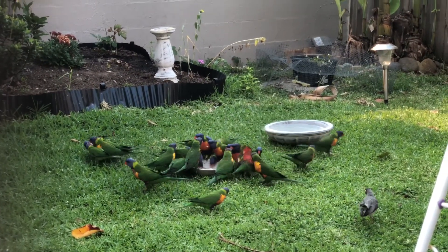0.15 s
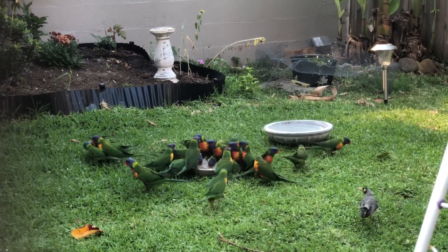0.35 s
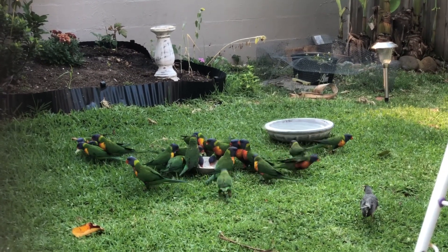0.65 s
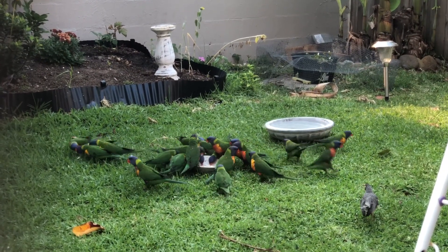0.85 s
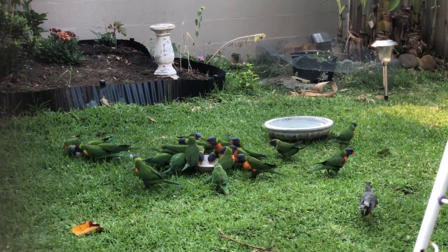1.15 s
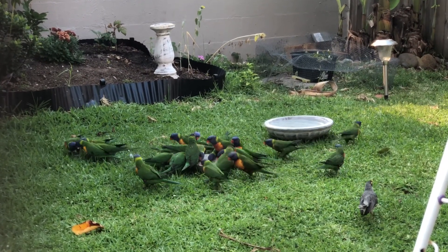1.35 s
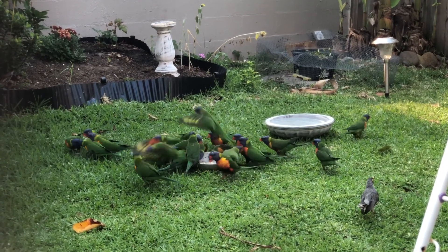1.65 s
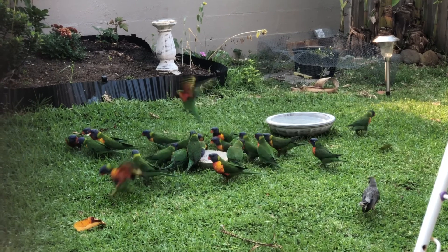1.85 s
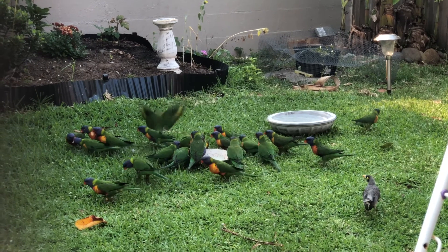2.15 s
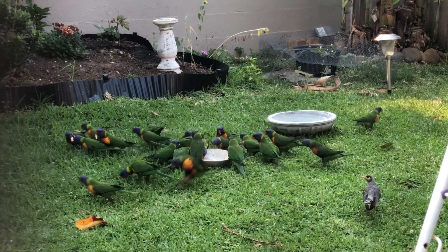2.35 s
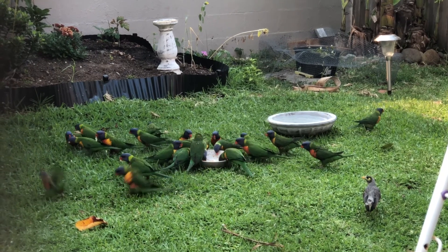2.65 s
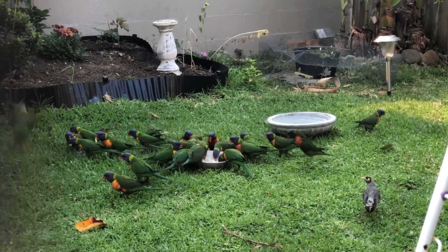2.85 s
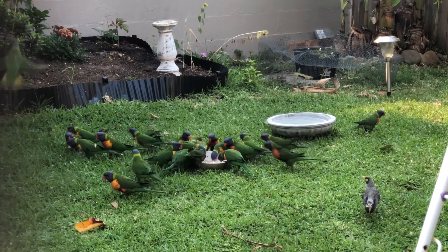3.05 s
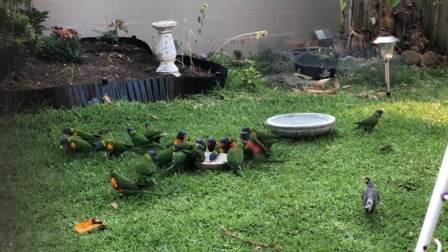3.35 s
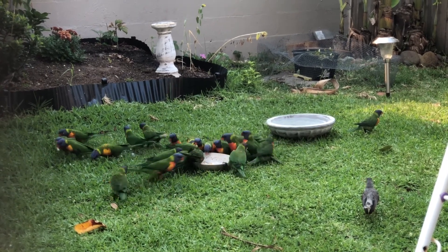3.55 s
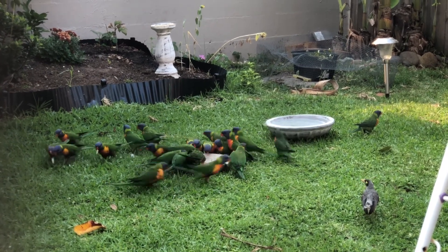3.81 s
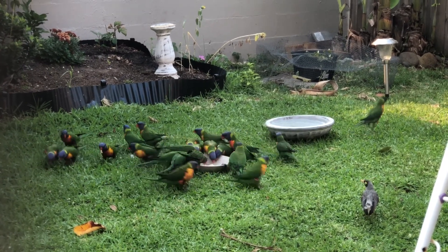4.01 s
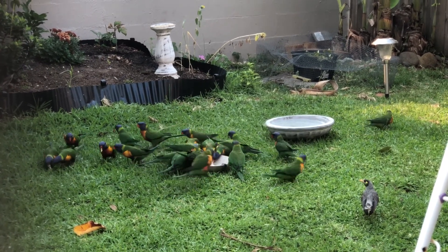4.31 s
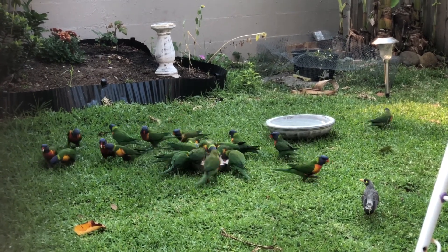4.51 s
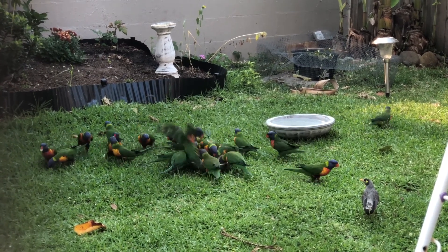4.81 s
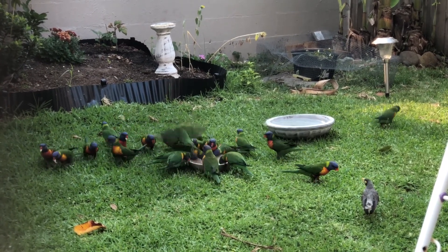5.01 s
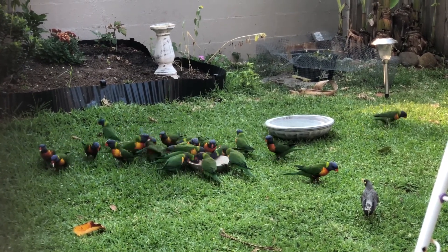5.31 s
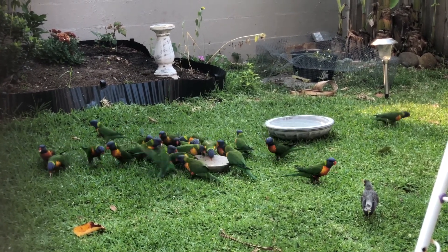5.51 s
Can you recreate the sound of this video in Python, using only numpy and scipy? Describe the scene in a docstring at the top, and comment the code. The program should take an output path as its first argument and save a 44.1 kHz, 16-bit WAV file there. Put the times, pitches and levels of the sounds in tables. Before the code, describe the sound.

Piercing parrot screeches early, quiet chirps and a whistle midway, then a run of raspy squawks, with a low outdoor hum behind.

```python
"""Lorikeets squabble over a feeding dish on a lawn, a few metres away: harsh screeches, squawks,
yelps, a clear whistle and thin chirps, with rustling wings, over a distant engine and a soft wash.
Calls are sums of harmonics blurred by chaos plus puffed noise, filtered by a voice colour.
Wings are noise pulsed by the beat; the engine is a bank of sines; the wash is filtered noise.
Discrete echoes and a short scattered tail throw calls and wings back."""
import sys
import numpy as np
from scipy import signal
from scipy.fft import rfft, irfft, next_fast_len
from scipy.io import wavfile
from scipy.ndimage import uniform_filter1d

SR = 44100
rng = np.random.default_rng(int(sys.argv[2]) if len(sys.argv) > 2 else 0)


def master_out(mix):
    """Clip the mix to full scale and print it as 16-bit PCM to the path in sys.argv[1]."""
    frames = np.transpose(np.atleast_2d(mix))
    ceiling = np.clip(frames, -1, 1)
    pcm = np.round(ceiling * 32767).astype(np.int16)
    wavfile.write(sys.argv[1], SR, pcm)


N = 250047

# voice colours, from syrinx, throat and beak: [f/Hz, level/dB]
SHRILL = [(600, -44), (1000, -14.5), (1500, -20), (2000, -12), (2800, -5), (3400, -6.5), (4050, 3.5),
          (4700, -5.5), (5400, 0.5), (6800, -8), (8500, -8.5), (11000, -18.5), (14000, -13.5), (16000, -27)]
HARSH = [(600, -54), (1000, -8.5), (1500, -20.5), (2000, -7.5), (2700, 0), (3200, -7), (3850, 5.5),
         (4400, -8), (5200, 2.5), (6500, -9.5), (8500, -10.5), (11500, -23.5), (16000, -26)]
HOARSE = [(700, -25.5), (1500, -14), (1900, -14), (2700, -3), (3500, -8.5), (4200, -0.5), (5500, -2.5),
          (7000, -7), (8500, -13), (11000, -19), (13500, -18), (16000, -28)]
NAGGING = [(800, -22), (1300, -8.5), (1600, -6), (2050, 4.5), (2600, 0.5), (3300, 1.5), (3850, -2.5),
           (4400, -17), (5200, 2.5), (6000, -4.5), (7200, -14), (9500, -14), (12500, -21), (16000, -34)]
THROATY = [(800, -21.5), (1400, -15), (1900, -4), (2350, -3), (2900, -14), (3500, -6.5), (4100, -22),
           (4750, -9), (5600, -26), (6800, -22.5), (8000, -22), (9300, -22), (12000, -39), (15000, -31)]
RASPING = [(700, -34), (1100, -6.5), (1600, -17), (2100, -5), (2650, -0.5), (3300, -1), (4000, 0),
           (4700, -4.5), (5500, -3.5), (7000, -8), (8500, -8), (11000, -17.5), (13500, -22.5), (16000, -24)]
PURE = [(900, -30), (1500, -8), (1950, 0), (2600, 0), (3900, -10), (5100, -9), (6200, -21), (7700, -19),
        (9200, -36), (11000, -26), (13000, -29), (15500, -28)]
MELLOW = [(500, 18), (800, 11.5), (1650, 13.5), (2600, 8), (3500, -1), (6000, -57), (12000, -51)]
SWEEP = [(1200, -24), (2200, 6), (3300, -32), (4600, 14.5), (5600, -6.5), (7000, -5), (9000, -28),
         (12000, -22), (16000, -12)]
GRUFF = [(800, -18), (1400, -14), (1900, 1), (2300, 3), (2850, -8), (3400, 1.5), (4050, -12.5),
         (4750, -0.5), (5600, -10), (6800, -7.5), (8100, -23), (9500, -17.5), (12000, -21), (15000, -21)]
SCOLDING = [(850, -35), (1280, -11), (1650, -30), (2050, 2), (2450, 0.5), (3050, -8.5), (3850, -4),
            (4300, -14), (5150, -4), (5900, -12), (6500, -8), (9500, -14.5), (12800, -31), (14800, -23)]


def amp(db):
    """Decibels to gain."""
    return 10 ** (np.asarray(db) / 20)


def unit(x):
    """Scales to rms 1."""
    return x / np.sqrt(np.mean(x ** 2) + 1e-20)


def read(points, hz):
    """Reads a table on a log-frequency axis."""
    f, value = np.transpose(points)
    return np.interp(np.log(hz + 1), np.log(f + 1), value)


def add(mix, s, sound):
    """Mixes a sound in at time s, trimmed to fit."""
    start = int(round(s * SR))
    sound = sound[max(-start, 0):]
    part = mix[max(start, 0):][:len(sound)]
    part += sound[:len(part)]


def colour(x, spectrum):
    """Filters by an [f/Hz, level/dB] table, 12 dB/octave down below its first point; rms 1."""
    size = next_fast_len(len(x) + 512)
    hz = np.fft.rfftfreq(size, 1 / SR)
    gain = amp(read(spectrum, hz)) * np.minimum(hz / spectrum[0][0], 1) ** 2
    return unit(irfft(rfft(x, size) * gain, size)[:len(x)])


def wander(rate_hz):
    """Smooth random motion: noise rolled off above rate_hz; rms 1."""
    hz = np.fft.rfftfreq(2 ** 18, 1 / SR)
    noise = rng.standard_normal(2 * len(hz) - 2)
    return unit(irfft(rfft(noise) / (1 + (hz / rate_hz) ** 4))[:N])


def membrane(turns, hz, chaos, blur):
    """Harmonics of one vibrating membrane; chaos turns each from a line into a band of its own."""
    offsets = rng.integers(N, size=(32, 2, 1))
    tone = np.zeros(len(turns))
    for k in range(1, int(SR / 2 / hz.max()) + 1):
        along, across = blur[(np.arange(len(turns)) + offsets[k]) % N] * chaos / np.sqrt(2)
        angle = 2 * np.pi * k * turns + k * k
        tone += (np.sqrt(1 - chaos ** 2) + along) * np.cos(angle) + across * np.sin(angle)
    return unit(tone)


def brighten(sound, effort_db, per_db, knee_hz=6500):
    """The treble is the last to come and the first to go as a bird presses harder and lets go."""
    hz = np.fft.rfftfreq(len(sound), 1 / SR)
    body = irfft(rfft(sound) / (1 + (hz / knee_hz) ** 6), len(sound))
    below_peak_db = np.maximum(effort_db - effort_db.max() + 0.5, -10)
    return body + (sound - body) * amp(per_db * below_peak_db)


def syrinx(voice, rows, chance, jitter=0.0535, smear=1.0, rasp=0.96, twin=0.48, twin_hz=1330,
           flutter_db=2, fitful=0.2805, waver=0.02995, bright_per_db=0.5):
    """One call: two membranes that slip in and out of chaos, heard through throat and beak."""
    # rows: t/s, effort/dB, pitch/Hz, roughness 0-1
    s, *columns = np.transpose(rows)
    t = np.arange(s[0], s[-1], 1 / SR)
    effort_db, hz, rough = (np.interp(t, s, c) for c in columns)
    fast, shake, fits, hiss = chance[:-1, (np.arange(len(t)) + rng.integers(N)) % N]
    # clearer and more chaotic stretches alternate within a call
    rough = np.clip(rough * (1 + fitful * fits), 0, 1)
    chaos = np.clip(smear * rough, 0, 1)
    # uneven cycles smear the upper harmonics most
    uneven = 1 + jitter * rough * fast + waver * np.minimum(rough, .5) * fits
    turns = np.cumsum(hz * uneven) / SR
    # in loud, rough calls the other side joins at its own pitch, bending with the first
    other_hz = twin_hz * hz / hz.mean() * (1 + jitter * rough * fast[::-1] + waver * shake / 2)
    joined = np.clip(twin * rough * np.interp(effort_db, [-28, -18], [0, 1]), 0, 1)
    tone = np.sqrt(1 - joined) * membrane(turns, hz, chaos, chance[-1])
    tone += np.sqrt(joined) * membrane(np.cumsum(other_hz) / SR, other_hz, chaos, chance[-1])
    # air escapes in one puff a cycle
    puffs = unit(hiss * (1 + 0.25 * np.cos(2 * np.pi * turns)))
    share = np.clip(rasp * rough ** 2, 0, 1)
    source = np.sqrt(1 - share) * tone + np.sqrt(share) * puffs
    sound = brighten(colour(source, voice), effort_db, bright_per_db)
    # level out, so that effort sets the loudness; roughness makes it shudder
    sound /= np.sqrt(abs(uniform_filter1d(sound ** 2, size=700)) + 1e-6)
    sound = unit(sound * amp(flutter_db * rough * shake))
    edges = np.clip(np.minimum(t - t[0], t[-1] - t) / 0.0012, 0, 1)
    return s[0], sound * amp(effort_db) * edges


def press(start, let_go, first_db, last_db, shape, belly_db=1.5):
    """A bird's effort: a quick attack, a hold that leans and swells, a release; gives t/s and dB."""
    attack_s, attack_db, release_s, release_db = shape
    t = np.arange(start, let_go + release_s, 1 / SR)
    u = np.minimum((t - start) / (let_go - start), 1)
    hold = first_db + (last_db - first_db) * u + belly_db * (np.sin(np.pi * u) - 2 / np.pi)
    attack = np.interp(t, [start, start + attack_s], [attack_db, 0])
    release = np.interp(t, [let_go, let_go + release_s], [0, release_db])
    return t, hold - attack - release


def upsweep(end, db, hz, length_s=.016, rise=.26, rough=0.27, attack_s=0.0056, attack_db=10,
            overlap_s=0.0069, fade_db=8, curve=1.5):
    """A clear note flicks up ever faster, then climbs on and fades under the body of the screech."""
    t = np.arange(-length_s, overlap_s, 1 / SR)
    knots_s = [-length_s, attack_s - length_s, 0, overlap_s]
    effort_db = db - np.interp(t, knots_s, [attack_db, 0, 0, fade_db])
    pitch = hz * (1 + rise * ((t - t[0]) / length_s) ** curve)
    return SWEEP, np.column_stack([end + t, effort_db, pitch, np.full(len(t), rough)])


def screech(voice, start, let_go, first_db, last_db, top_hz, last_hz,
            first_rough, middle_rough, last_rough, sweep_db, sweep_hz, scoop_share=.1, scoop_s=.036):
    """An upsweep breaks into a low, loud note that scoops up to its top pitch, then sags."""
    # effort: [attack/s, attack depth/dB, release/s, release depth/dB]
    screech_shape = (0.031, 6.6, .045, 22.5)
    t, effort_db = press(start, let_go, first_db, last_db, screech_shape)
    scoop = scoop_share * top_hz * np.maximum(1 - (t - start) / scoop_s, 0) ** 2
    sag = (top_hz - last_hz) * np.maximum(t - start - scoop_s, 0) / (let_go - start - scoop_s)
    knots_s = [start, (start + let_go) / 2, let_go]
    rough = np.interp(t, knots_s, [first_rough, middle_rough, last_rough])
    body = np.column_stack([t, effort_db, top_hz - scoop - sag, rough])
    return [upsweep(start, sweep_db, sweep_hz), (voice, body)]


def engine(unsteady=0.35, drift=0.0085):
    """The low, loosely harmonic drone of a far engine, each line fading in and out on its way."""
    # course: [t/s, level/dB, cycle rate/Hz before drift]
    engine_course = [(0, -37, 23.3), (.7, -32.5, 23.9), (1.2, -36.5, 23.76), (1.7, -35.5, 24.22),
                     (2.3, -38.5, 23.56), (2.85, -38, 23.59), (3.15, -42.5, 23.38), (4, -49, 22.8),
                     (4.6, -44.5, 24.23), (5.2, -41, 24.5), (5.67, -50, 23.76)]
    # lines: [multiple of the cycle rate, relative level/dB]
    engine_orders = [(1.93, -9), (3, -1), (4.1, -11), (5.06, -4.5), (6, -12), (7, -10), (8, -15), (9.5, -9),
                     (11, -15), (14, -13)]
    s, db, hz = np.transpose(engine_course)
    t = np.arange(N) / SR
    turns = np.cumsum(np.interp(t, s, hz) * (1 + drift * wander(rate_hz=3))) / SR
    hum = np.zeros(N)
    for k, order_db in engine_orders:
        fading = 1 + unsteady * wander(rate_hz=9.1)
        hum += amp(order_db) * fading * np.sin(2 * np.pi * (k * turns + rng.random()))
    return amp(np.interp(t, s, db)) * unit(hum)


def air(level_db=-38.5, swell_db=-0.84):
    """The gently swelling wash of the suburb: filtered noise."""
    # spectrum: [f/Hz, relative density/dB per Hz]
    air_spectrum = [(15, -41), (25, -21), (75, -2.5), (140, -13.5), (227, -6.5), (331, -14.5), (470, -14.5),
                    (1140, -18), (1380, -18), (1860, -27), (2930, -26.5), (3740, -28), (6240, -34.5),
                    (7330, -37.5), (15600, -49.5)]
    swell = amp(level_db + swell_db * wander(rate_hz=1.7))
    return swell * colour(rng.standard_normal(N), air_spectrum)


def twitter(count=48, level_db=-54.5, spread_db=5, pitch_hz=2800, length_s=0.056, slide=0.1424):
    """Random faint chirps from the edge of the flock: t/s, t/s, level/dB, f/Hz, f/Hz."""
    place, long, loud, high, slope = rng.uniform(-1, 1, (count, 5)).T
    start = (np.arange(count) + (1 + place) / 2) * N / SR / count
    end = start + length_s * (1 + long / 2)
    hz = pitch_hz * (1 + 0.067 * high)
    first_hz, last_hz = hz * (1 - slide * slope), hz * (1 + slide * slope)
    return list(zip(start, end, level_db + spread_db * loud, first_hz, last_hz))


def squawk(voice, start, attack_s, let_go, first_db, last_db, hz, rough, bend_per_db=.004):
    """A hoarse note whose pitch follows the effort."""
    # effort: [attack depth/dB, release/s, release depth/dB]
    squawk_shape = (11, .036, 20.3)
    t, effort_db = press(start, let_go, first_db, last_db, (attack_s, *squawk_shape))
    pitch = hz * (1 + bend_per_db * (effort_db - (first_db + last_db) / 2))
    return voice, np.column_stack([t, effort_db, pitch, np.full(len(t), rough)])


def glide(voice, start, end, db, first_hz, last_hz, rough, settle=2.0, in_db=5, out_db=3):
    """A yelp or chirp slides from one pitch, quickly at first, and settles on another; it swells."""
    t = np.arange(start, end, 1 / SR)
    u = (t - start) / (end - start)
    effort_db = db - np.interp(u, [0, .5, 1], [in_db, 0, out_db])
    pitch = last_hz + (first_hz - last_hz) * abs(1 - u) ** settle
    return voice, np.column_stack([t, effort_db, pitch, np.full(len(t), rough)])


def wings(beat_hz=21, depth=0.39):
    """Feathers swish once a wingbeat as birds hop and take off."""
    # wing flurries: [middle/s, length/s, level/dB]
    flurries = [(1.6, 0.22, -31.5), (2.727, 0.13, -44.5), (3.05, 0.05, -53), (3.959, 0.071, -44),
                (5.125, 0.18, -36.5)]
    # feather noise: [f/Hz, level/dB]
    feathers = [(100, -17), (400, 0), (1500, 2.5), (4500, 6.5), (7500, 1), (11000, -16), (16000, -10)]
    t = np.arange(N) / SR
    level = sum(amp(db) * np.exp(-(2 * (t - s) / length) ** 2) for s, length, db in flurries)
    rate_hz = beat_hz * (1 + 0.092 * wander(rate_hz=2.8))
    beats = 1 + depth * np.sin(2 * np.pi * np.cumsum(rate_hz) / SR)
    return level * beats * colour(rng.standard_normal(N), feathers)


def whistle():
    """One long whistle rises, then sinks, its second harmonic strong at first and weak later."""
    # voice colours of the whistle's rise and fall: [f/Hz, level/dB]
    rise_voice = [(1900, -3), (2550, 1), (3800, -13), (5050, -3.5), (6300, -22), (7600, -13.5), (9000, -40),
                  (10200, -28), (12600, -20), (15200, -18)]
    fall_voice = [(2000, -12), (2700, -1.5), (4000, -19), (5200, -38), (5650, -18), (7700, -15.5),
                  (8400, -26), (9900, -31), (11200, -22), (12800, -25), (14000, -37), (15400, -22)]
    # courses: [t/s, effort/dB, pitch/Hz, roughness 0-1]
    rise_course = [(3.286, -46, 2460, 0.1), (3.297, -21.5, 2530, 0.07), (3.318, -38, 2533, 0.13),
                   (3.357, -39, 2500, 0.38), (3.365, -19, 2518, 0.06), (3.388, -20.5, 2540, 0.1),
                   (3.405, -24, 2606, 0.26), (3.447, -27, 2816, 0.65)]
    fall_course = [(3.443, -19.5, 2840, 0.15), (3.47, -10, 2829, 0), (3.48, -29, 2788, .13),
                   (3.495, -15.5, 2803, 0.083), (3.545, -22.5, 2750, .05), (3.578, -18.5, 2570, 0.0022),
                   (3.6, -24.5, 2557, .03), (3.625, -27, 2510, .13)]
    return [(rise_voice, rise_course), (fall_voice, fall_course)]


def flock(chirp_rough=.3):
    """Screeches, squawks, yelps, whistle and chirps, all from the same kind of syrinx."""
    # nearest bird: [voice, start/s, let-go/s, first/dB, last/dB, top pitch/Hz, last pitch/Hz,
    # roughness 0-1 at start, middle and end, upsweep/dB, upsweep start pitch/Hz]
    screeches = [ (SHRILL, -.03, .066, -10.5, -12.5, 1075, 1020, 0.41, .54, 0.69, -20, 2250),
                 (SHRILL, 0.19, 0.29, -8, -9.5, 1005, 965, .45, 0.69, .58, -21, 2300),
                 (HARSH, .413, 0.52, -15, -12, 1060, 925, .22, .68, 0.35, -15.5, 2220),
                 (SHRILL, 1.352, 1.459, -9.5, -12, 1055, 970, 0.15, 0.39, 0.61, -11.5, 2390),
                 (SHRILL, 1.965, 2.069, -13.5, -12.5, 1045, 995, 0.21, 0.44, .56, -22.5, 2500), ]
    # squabbling birds: [voice, start/s, attack/s, let-go/s, first/dB, last/dB, pitch/Hz, roughness 0-1]
    squawks = [ (THROATY, .134, 0.0182, .154, -28, -28, 1340, 0.39),
               (THROATY, .968, .026, 1.03, -32, -29.5, 1200, 0.69),
               (HOARSE, 1.027, 0.0351, 1.172, -17, -15.5, 1390, 0.803),
               (NAGGING, 1.2, 0.0388, 1.335, -29.5, -27.5, 1280, .66),
               (NAGGING, 1.475, 0.0347, 1.522, -23.5, -22, 1292, 0.47),
               (NAGGING, 1.525, 0.0263, 1.684, -27, -24.5, 1305, 0.48),
               (THROATY, 1.6, .03, 1.7, -38, -29.5, 972, 0.45),
               (MELLOW, 2.505, 0.014, 2.57, -42.5, -43.5, 810, .42),
               (MELLOW, 2.59, .025, 2.695, -40.5, -39, 862, 0.54),
               (GRUFF, 3.307, .028, 3.525, -31, -28.5, 1195, 0.605),
               (THROATY, 4.24, 0.0305, 4.41, -45, -35.5, 1100, 0.85),
               (SCOLDING, 4.402, 0.0375, 4.492, -24, -23, 1280, 0.6),
               (THROATY, 4.7, 0.0045, 4.768, -25.5, -23.5, 1178, 0.51),
               (THROATY, 4.765, 0.027, 4.825, -29, -30, 1125, .5),
               (RASPING, 4.82, .026, 4.875, -32, -28, 1070, .6),
               (RASPING, 4.872, 0.01974, 4.903, -14.5, -18, 1035, 0.74),
               (RASPING, 4.94, 0.0077, 4.995, -23.5, -25.5, 1255, 0.33),
               (RASPING, 5, .026, 5.113, -26, -18.5, 1330, 0.599),
               (RASPING, 5.005, .03, 5.138, -21, -21.5, 1130, 0.55),
               (GRUFF, 5.13, 0.01994, 5.19, -29.5, -30.5, 1300, 0.85),
               (GRUFF, 5.302, 0.0238, 5.378, -25, -23.5, 1175, 0.59),
               (GRUFF, 5.43, 0.0298, 5.58, -29, -28.5, 1198, 0.65),
               (RASPING, 5.577, 0.0286, 5.656, -14.5, -16, 1350, .76),
               (MELLOW, 5.52, 0.032, 5.63, -41.5, -34.5, 793, .25), ]
    # yelps: [voice, start/s, end/s, level/dB, first pitch/Hz, last pitch/Hz, roughness 0-1]
    yelps = [ (PURE, .386, .404, -28.5, 1940, 2150, .22), (PURE, 1.755, 1.808, -33, 2250, 1740, 0.36),
             (PURE, 1.816, 1.828, -30, 3500, 2700, .2), (PURE, 1.822, 1.841, -23.5, 2640, 2520, 0.067),
             (SWEEP, 1.822, 1.842, -24.5, 2660, 2520, 0.12), (PURE, 1.838, 1.854, -26.5, 2500, 1700, 0.37),
             (SWEEP, 1.858, 1.897, -33, 2400, 2120, 0.27), (PURE, 1.862, 1.9, -27.5, 2380, 2100, 0.41),
             (SHRILL, 1.946, 1.97, -23.5, 1150, 1300, .3), (THROATY, 4.635, 4.676, -36.5, 1124, 1110, .2),
             (SWEEP, 4.636, 4.674, -36.5, 2240, 2230, .1), (PURE, 4.674, 4.704, -35.5, 1900, 1570, .55),
             (PURE, 4.91, 4.96, -35, 1900, 1720, 0.32), (PURE, 5.19, 5.25, -38, 2050, 1500, 0.401),
             (PURE, 5.262, 5.312, -31.5, 2220, 1980, 0.2), ]
    # contact chirps: [start/s, end/s, level/dB, first pitch/Hz, last pitch/Hz]
    chirps = [ (.722, .777, -51, 3130, 3120), (.83, .93, -48.5, 3280, 3720), (.803, .874, -44, 2143, 2420),
              (.855, .925, -44.5, 2680, 2880), (.919, .975, -43, 3064, 3420),
              (2.33, 2.385, -54, 2356, 2460), (2.448, 2.535, -44.5, 2510, 3114),
              (2.8, 2.885, -48.5, 3740, 3090), (2.845, 2.924, -45, 2800, 2340),
              (3.245, 3.303, -40.5, 2505, 2435), (3.713, 3.816, -46.5, 3540, 3710),
              (3.741, 3.793, -46, 2450, 2290), (3.84, 3.898, -49, 2600, 3230),
              (4.02, 4.066, -45.5, 4090, 3280), (4.085, 4.169, -38, 2550, 3220),
              (4.335, 4.37, -43, 2250, 2296), ]
    # chirp voice colour: [f/Hz, level/dB]
    thin_voice = [(2000, -8), (3200, -4), (4500, 13.5), (6300, 5), (7500, -5.5), (9500, -15), (12000, -23),
                  (16000, -20)]
    # jitter, shudder, fits, hiss and blur, shared by all calls
    chance = np.array([wander(rate_hz=476), wander(rate_hz=72), wander(rate_hz=92.6),
                       rng.standard_normal(N), wander(rate_hz=305)])
    calls = [part for row in screeches for part in screech(*row)]
    calls += [squawk(*row) for row in squawks]
    calls += [glide(*row) for row in yelps]
    calls += whistle()
    calls += [glide(thin_voice, *row, chirp_rough) for row in list(chirps) + twitter()]
    out = np.zeros(N)
    for voice, rows in calls:
        add(out, *syrinx(voice, rows, chance))
    return out


def garden(x, tail_db=-11, build_s=0.012):
    """A few hard reflections, and scatter from plants and fences that lasts longest in mid-band."""
    # scatter decay: [f/Hz, t60/s]
    decay = [(300, 0.12), (2500, 0.36), (5000, 0.36), (9000, 0.33), (15000, 0.17)]
    # lawn, wall and fence: [delay/s, level/dB]
    echoes = [(.0013, -37), (.0047, -15), (0.021, -9), (0.029, -20), (0.045, -22)]
    hz, t, z = signal.stft(rng.standard_normal(SR), SR, nperseg=256)
    z = z * amp(-60 * t / read(decay, hz)[:, None]) * (1 - np.exp(-t / build_s))
    response = signal.istft(z, SR, nperseg=256)[1]
    response *= amp(tail_db) / np.linalg.norm(response)
    for delay, db in echoes:
        add(response, delay, amp([db]))
    return x + signal.fftconvolve(x, response)[:N]


def scene():
    """Birds in the garden over the background."""
    birds = garden(amp(-0.15) * (flock() + wings()))
    return (birds + engine() + air())[None]


def record(dry, ceiling=0.83, low_cut_hz=32, edge_hz=15850):
    """The microphone drops the deepest rumble, the loudest peaks overload; then the band limit."""
    low_cut = signal.butter(4, low_cut_hz, "highpass", fs=SR, output="sos")
    clipped = np.clip(signal.sosfilt(low_cut, dry), -ceiling, ceiling)
    band_limit = signal.firwin(511, edge_hz, window=("kaiser", 9), fs=SR)
    return signal.oaconvolve(clipped, band_limit[None], "same")


dry = scene()
out = record(dry)
master_out(out)
```